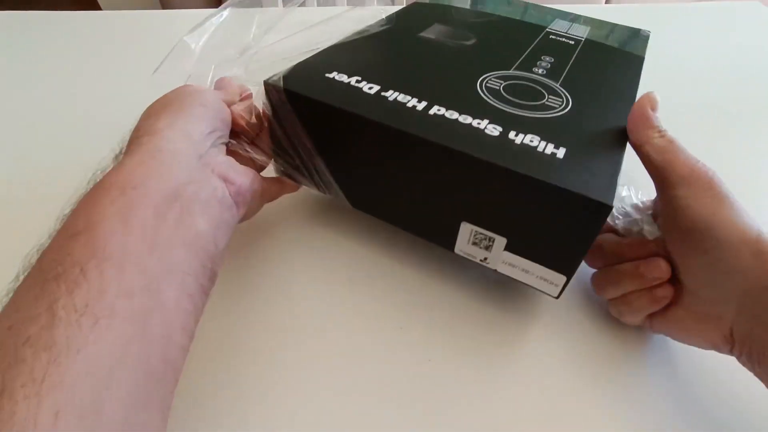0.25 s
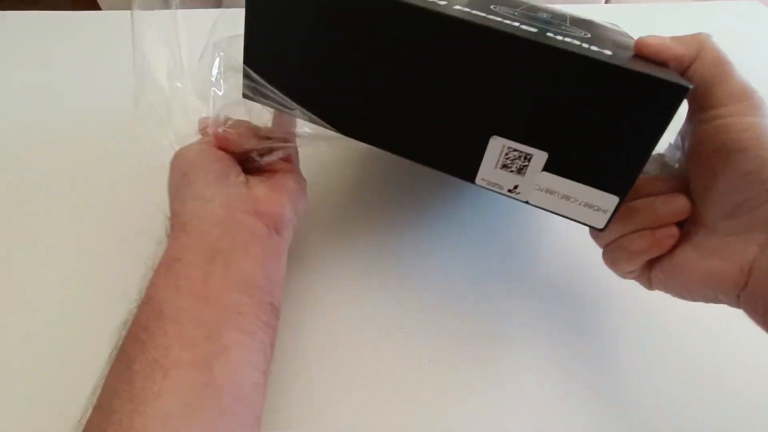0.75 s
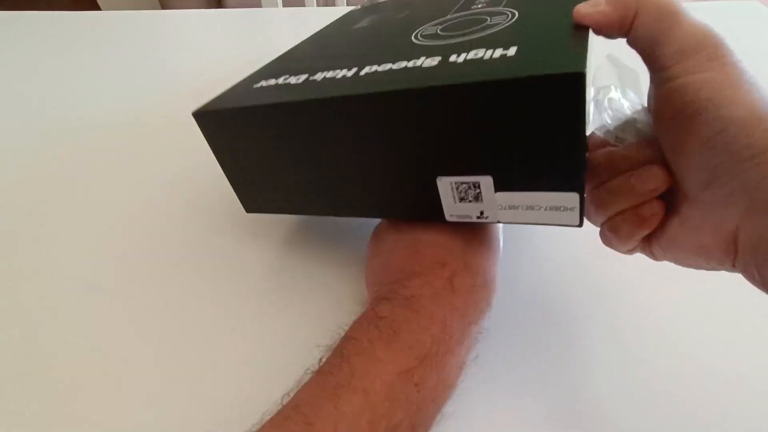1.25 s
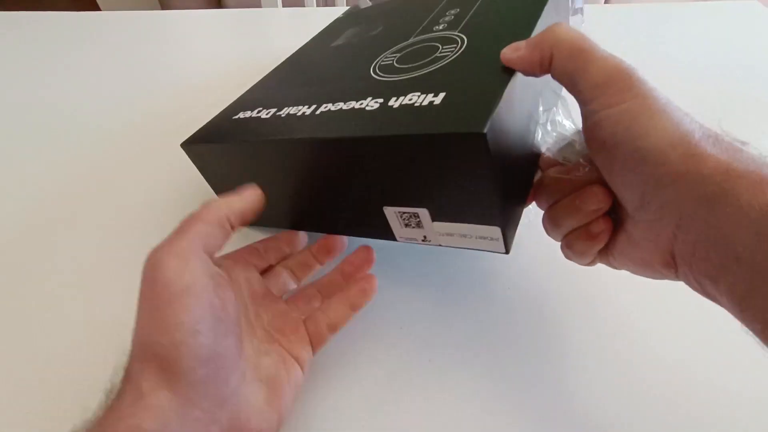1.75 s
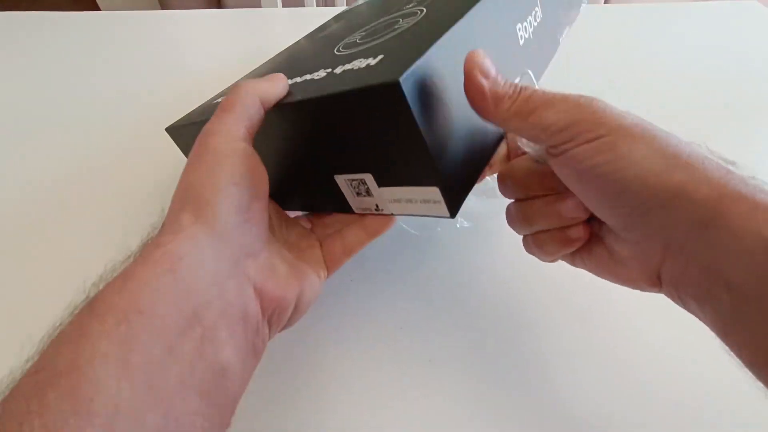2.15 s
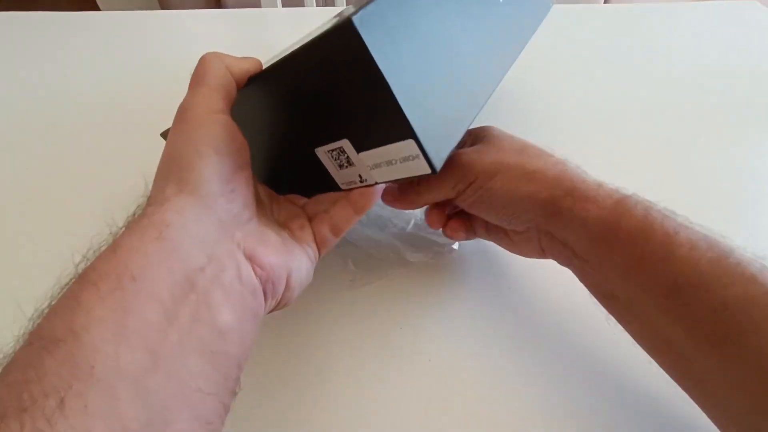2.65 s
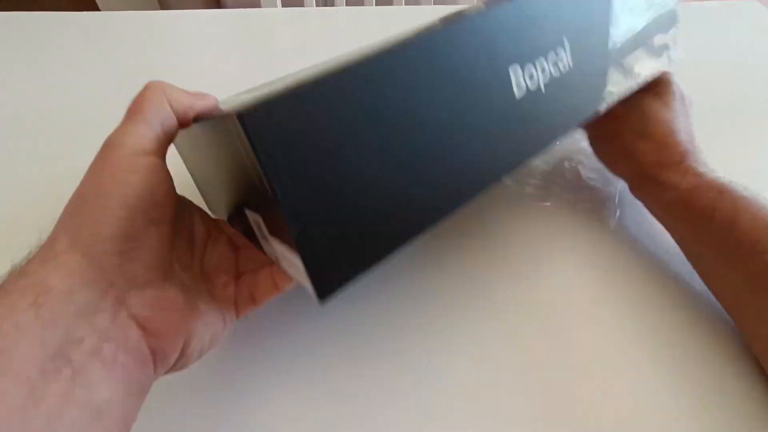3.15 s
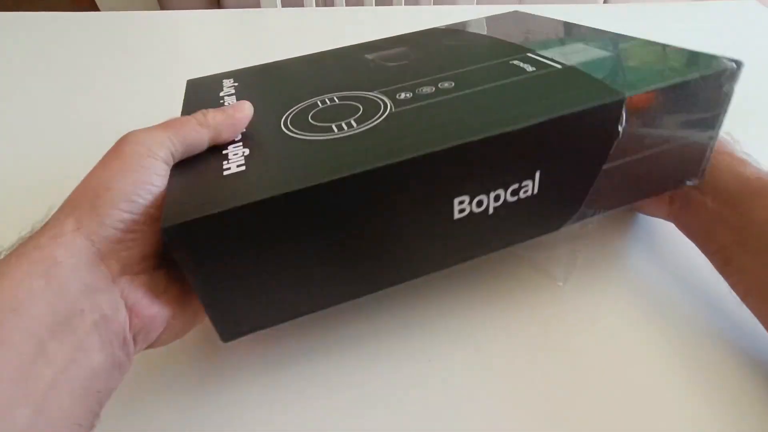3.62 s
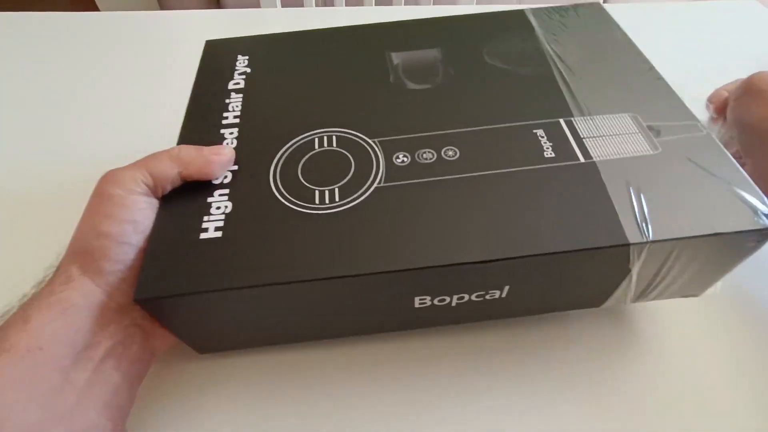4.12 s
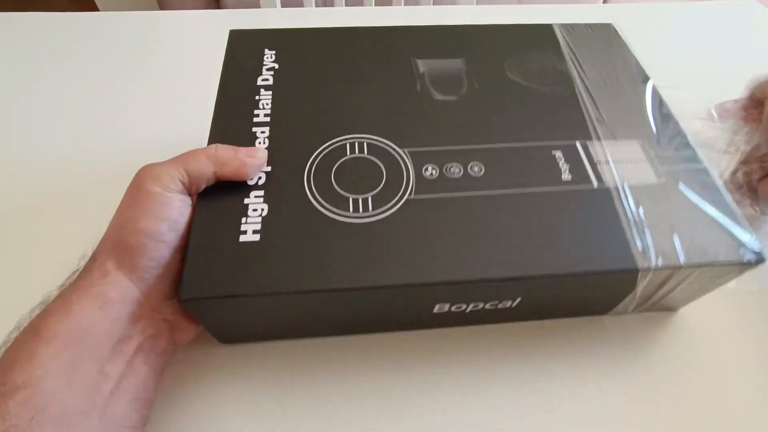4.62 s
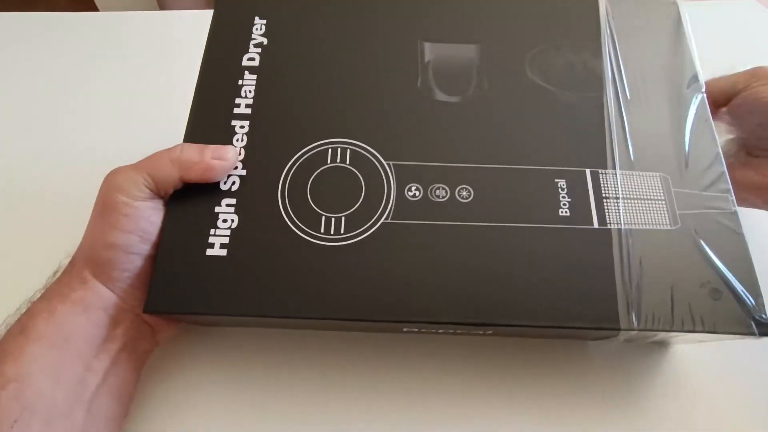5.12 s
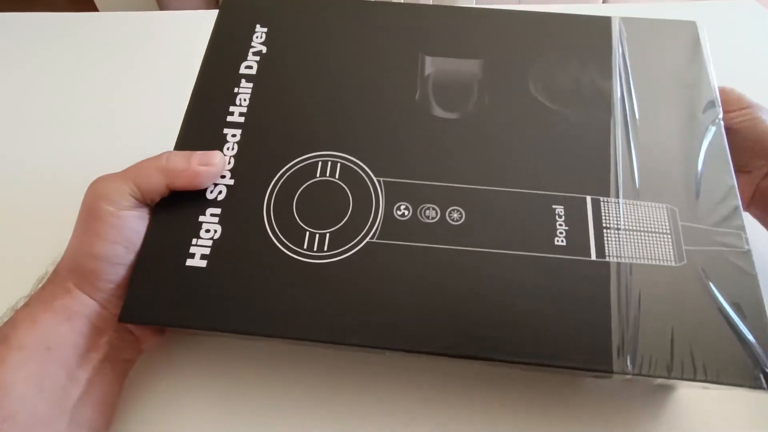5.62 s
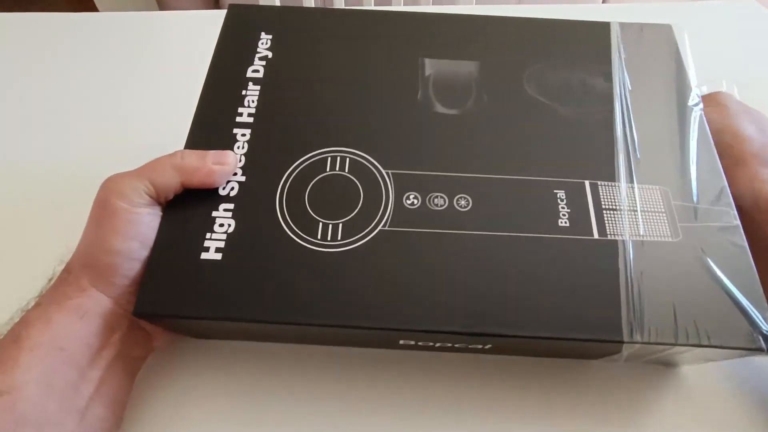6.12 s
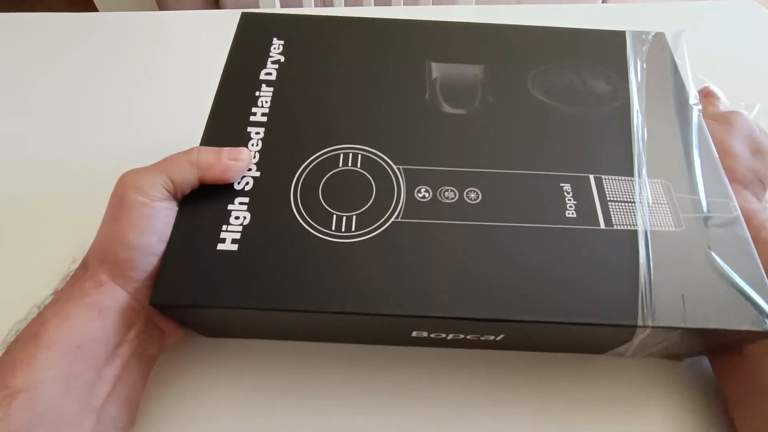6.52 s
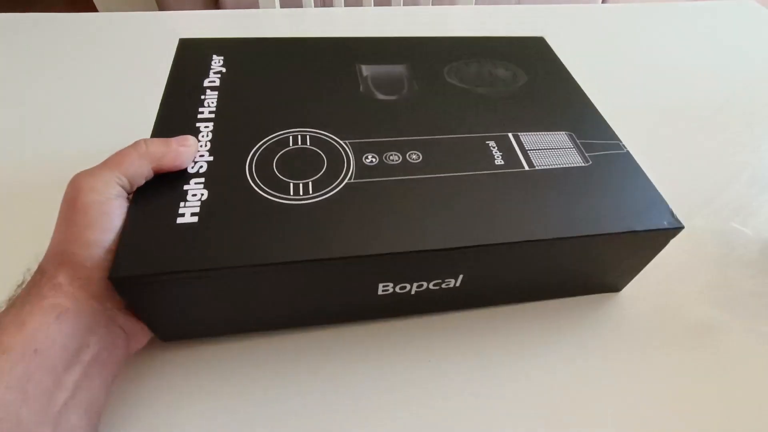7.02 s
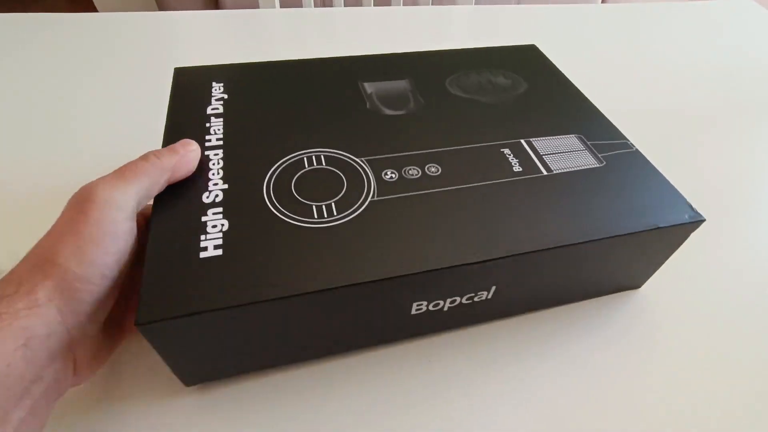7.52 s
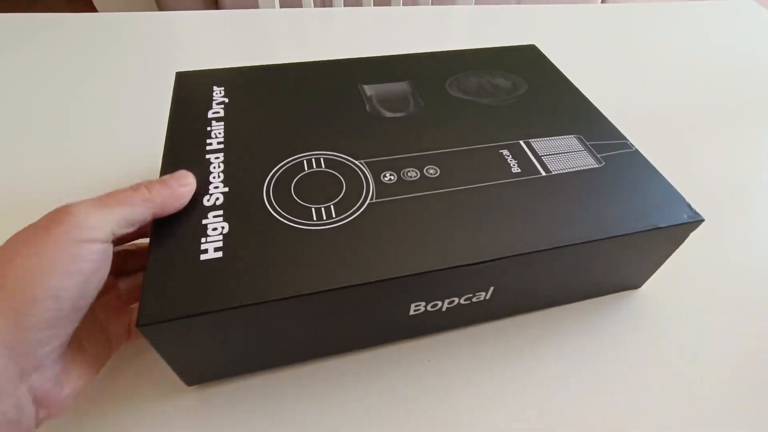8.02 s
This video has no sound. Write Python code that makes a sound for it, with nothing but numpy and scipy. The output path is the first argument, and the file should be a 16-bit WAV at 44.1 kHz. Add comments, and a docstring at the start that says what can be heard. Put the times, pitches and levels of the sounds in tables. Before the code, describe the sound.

Close two-channel pickup in a small quiet room: thin plastic wrap crackles finely from the start, with sharp snaps and a dense burst around one second. Hollow cardboard knocks follow as the box is turned, then rustling swells again near three to four seconds. Later come isolated loud snaps, light knocks and a final tug, fading to sparse crinkles.

```python
"""In a small room, thin plastic film is pulled off a cardboard box and crumpled, close to a two-channel microphone.
The film crackles in thousands of tiny damped swings, with a few loud snaps, drags and scuffs over the card.
The hollow box knocks on hands and table: short pushes, cracks and scrapes set its resonances ringing.
The table top shudders after the heavier knocks; room echoes and quiet filtered noise fill in behind."""
import sys
import numpy as np
from scipy import signal
from scipy.fft import rfft, irfft, next_fast_len
from scipy.io import wavfile
from scipy.ndimage import uniform_filter1d, map_coordinates

SR = 44100
rng = np.random.default_rng(int(sys.argv[2]) if len(sys.argv) > 2 else 0)


def dump_mix(stems):
    """Bounce the given channels to the path in sys.argv[1] as a 16-bit WAV at rate SR."""
    frames = np.atleast_2d(stems).T  # one column per channel
    limited = np.clip(frames, -1, 1)  # hard clip at full scale
    pcm = np.round(limited * 32767).astype(np.int16)
    wavfile.write(sys.argv[1], SR, pcm)


N = 364265

# Resonances of the box walls and of its edges. Each row: pitch in Hz, width in Hz, relative level in dB.
WALLS = [(414, 41.4, -1.5), (500, 26.7, -4.95), (636, 73, -5.4), (808, 73, -2.4), (960, 130, -6)]
EDGE = [(1180, 710, -1), (1625, 360, 4), (2300, 1400, -2), (3270, 2600, -11.5)]
# Hands working the film all along. Each row: time in seconds, relative crackle level in dB,
# treble tilt in dB per octave, relative level in dB of slack folds dragging over the card.
HANDLING = [(0, -32, -4, -41), (.3, -34, -1, -48), (.6, -35, -1.5, -52), (.88, -42, -4, -55),
            (1.5, -31, -4, -48), (1.76, -40, -4, -52), (1.86, -60, -2, -55), (2.03, -60, 0, -55),
            (2.12, -45, 0, -56), (2.42, -53, -1, -60), (2.78, -34, -1.5, -48), (3.5, -32, -2, -43),
            (3.82, -35, -2.5, -46), (4.25, -40, 2, -54), (4.36, -51, -1, -55), (4.62, -50, -2, -59),
            (4.9, -37, -2.5, -52), (5.4, -35, -2, -48), (5.6, -38, -1, -52), (6.36, -38, -2, -47),
            (6.55, -46, 0, -50), (6.92, -37, -1, -50), (7.5, -40, -1, -52), (8.26, -50, 0, -54)]


def amp(db):
    """Turn decibels into a plain factor."""
    return 10 ** (np.asarray(db) / 20)


def unit(x):
    """Scale a sound to an rms (average strength) of 1."""
    return x / np.sqrt(np.mean(x ** 2) + 1e-20)


def along(points, hz):
    """Read a curve of (Hz, value) points on a logarithmic pitch axis."""
    f, v = np.transpose(points)
    return np.interp(np.log(hz + 1), np.log(f + 1), v)


def curves(rows, t):
    """Read each column after the time, at times t, with straight lines between rows."""
    s, *cols = np.transpose(rows)
    return [np.interp(t, s, c) for c in cols]


def wobble(rate):
    """A smooth random curve with `rate` random points a second."""
    knots = rng.standard_normal(int(N * rate / SR) + 4)
    return map_coordinates(knots, [np.arange(N) * rate / SR])


def filtered(x, response):
    """Multiply the spectrum of x by a response, given as a function of frequency."""
    m = next_fast_len(N + SR)
    return irfft(rfft(x, m) * response(np.fft.rfftfreq(m, 1 / SR)), m)[..., :N]


def modes(table):
    """Response of a set of damped resonances, added with alternating sign."""
    def response(f):
        total = 0
        for k, (centre, width, db) in enumerate(table):
            damping = 1j * f * width
            total = total + (-1) ** k * amp(db) * damping / (centre * centre - f * f + damping)
        return total
    return response


def air():
    """The still room: coloured noise, near mono in the bass and less alike between channels in the treble."""
    # Colour of the quiet room. Each row: frequency in Hz, relative level in dB per Hz.
    air_colour = [(15, -37), (25, 6), (145, 4.5), (301, 4), (591, -46), (962, -13), (1100, -17),
                  (2110, -5.5), (7310, -6.5), (9320, -10), (16000, -26)]

    def response(hz):
        return amp(along(air_colour, hz)) * np.array([np.ones_like(hz), hz / (hz + 500)])

    mid, side = filtered(rng.standard_normal((2, N)), response)
    return amp(-46.5) * unit(np.array([mid + side, mid - side]))


def room(x):
    """The walls answer with decaying noise; the source moves, so each moment hears another of several tails."""
    # How fast the echoes fade. Each row: frequency in Hz, time in seconds to fall by 60 dB.
    fade_times = [(100, 0.33), (400, 0.38), (1500, 0.24), (5000, 0.23), (14000, 0.15)]
    hz, t, z = signal.stft(rng.standard_normal((6, 2, SR // 3)), SR, nperseg=256)
    fading = amp(-60 * t / along(fade_times, hz)[:, None])
    tails = signal.istft(z * fading, SR, nperseg=256)[1]
    turn = np.arange(N) / SR / .03  # the next tail takes over every 30 ms
    wet = 0
    for k, tail in enumerate(tails):
        share = np.sqrt((1 - np.abs((turn - k) % len(tails) - 1)).clip(0))
        delayed = np.pad(x * share, (150, 0))[None]  # the echo starts 150 samples late
        wet = wet + signal.oaconvolve(delayed, tail / np.linalg.norm(tail[0]), axes=1)[:, :N]
    return wet


def knocks():
    """Split each knock's strength over the parts: rows of time, big panels, small panels, walls, edge, table."""
    # Knocks of the box. Each row: time in seconds, relative push in dB, share on the small panels (0-1),
    # relative crack in dB, share on the edge (0-1).
    knock_rows = [(.165, -32, .7, -37, .25), (.394, -36, .8, -41, .7), (.578, -27, .2, -32, .7),
                  (.635, -17.5, .2, -17, .75), (.927, -29, .3, -23, .5), (.939, -14.5, .1, -5, .75),
                  (.963, -22, .95, -30, .7), (1.237, -26.5, .15, -45, .8), (1.274, -18, .2, -45, .3),
                  (1.644, -21.5, .2, -37, .4), (1.792, -6.5, .2, -18, .2), (1.912, -27.5, .95, -43, .6),
                  (3.014, -32, .6, -34, .8), (3.12, -12, .3, -40, .7), (3.286, -14.5, .99, -29, .15),
                  (3.31, -11, .07, -36, .3), (3.444, -21, .03, -36, .7), (3.566, -24.5, .75, -29, .5),
                  (4.414, -31, .45, -20.5, .93), (4.726, -22, .7, -26, .5), (4.739, -11, .83, -12, .1),
                  (4.791, -19, .1, -27, .5), (5.092, -31, .65, -35, .5), (5.205, -27.5, .15, -34, .6),
                  (5.684, -29, .02, -45, .8), (6.425, -28, .45, -23, .85), (6.557, -36, .8, -48, .3),
                  (6.618, -34, .8, -44, .3), (6.701, -27, .45, -24, .7), (6.724, -25, .6, -33, .5),
                  (6.76, -27, .2, -32, .8), (7.084, -29, .6, -35, .9), (7.11, -24, .75, -33, .5),
                  (7.193, -27, .5, -14, .7), (7.201, -33, .5, -16, .6), (7.213, -17, .93, -19, .3)]
    # The box weighs down on the table top. Each row: time in seconds, relative level in dB.
    bump_rows = [(.394, -42), (.963, -31), (1.912, -27.5), (3.286, -27), (3.444, -26), (4.235, -25.5),
                 (5.205, -36), (6.705, -27), (6.76, -29)]
    s, push, small, crack, edge = np.transpose(knock_rows)

    def part(db, share):
        return db + 10 * np.log10(share.clip(.01, 1))

    rows = [s, part(push, 1 - small), part(push, small),
            part(crack, 1 - edge), part(crack, edge),
            push - 21]  # what the table top gets of each push, before the box's own part levels
    bumps = [(at, -120, -120, -120, -120, db) for at, db in bump_rows]  # -120 dB: next to nothing
    return list(np.transpose(rows)) + bumps


def box():
    """Each knock is a soft push into panels and table, a crack and scrape into walls and edges; hands rub."""
    # Resonances of big panels, small panels and table top.
    # Each row: pitch in Hz, width in Hz, relative level in dB.
    big_panels = [(102, 40, -6), (116, 18.3, 2), (153.2, 47.5, 1.5)]
    small_panels = [(252, 20.8, 4.5), (298.4, 21.3, 1.5), (343, 60, -3.5)]
    table_top = [(34.7, 2.7, 0), (58.6, 7.5, 0)]
    # Hands shifting on the box. Each row: time in seconds, relative rub level in dB, table shudder in dB.
    grip_rows = [(0.0, -46.5, -61), (1.01, -43, -52), (2.85, -53, -55), (3.38, -42, -35), (3.84, -45, -55),
                 (4.23, -52.5, -50), (5.29, -43, -55), (6.83, -49, -57), (8.26, -55.5, -61)]
    parts = np.zeros((2, 5, N + SR))
    t = np.arange(-512, 2048) / SR
    soft = np.exp(-(t - .002) ** 2 / 0.00071 ** 2)
    crack = 8 * np.exp(-(t - .004) ** 2 / .00006 ** 2)

    def scrape(fall):
        """Noise of random signs that rises in about 4 ms and dies away over `fall` seconds."""
        envelope = np.exp(-np.maximum((.003 - t) / .004, (t - .003) / fall))
        return np.sign(rng.standard_normal(len(t))) * envelope

    part_db = [15.1, 18.1, 13, 6.8, 26.3]
    facing_db = np.outer([.5, -.5], [1, -0.6, -1.4, -2.3, 2.8])  # each part faces its own way
    for s, *db in knocks():
        small_push = soft * np.sign(rng.standard_normal())  # inward or outward
        push = [soft, small_push, crack + scrape(0.018), crack + scrape(0.012), soft]
        level_db = np.add(db, part_db) + facing_db
        slot = parts[..., round(s * SR) - 512:][..., :len(t)]
        slot += amp(level_db)[..., None] * push
    bodies = (big_panels, small_panels, WALLS, EDGE, table_top)
    *card, table = [filtered(parts[:, k, :N], modes(body)) for k, body in enumerate(bodies)]

    rub_db, shudder_db = curves(grip_rows, np.arange(N) / SR)
    noise = rng.standard_normal((3, N))
    rub = amp(4.5 * wobble(12)) * filtered(noise[0], modes(big_panels + small_panels))
    rub = amp(rub_db) * unit(rub)
    shudder = noise[1] + 0.65 * noise[2] * [[1], [-1]]  # the channels shake a little apart
    shudder = amp(1.2 * wobble(5)) * filtered(shudder, modes(table_top))
    shudder = amp(shudder_db) * unit(shudder)
    return sum(card) + rub, table + shudder


def creases(s, db, hz, cycles, spread_ms, size):
    """Each buckling crease is a short damped swing, in or out, reaching both channels from its own spot."""
    # Where the film is. Each row: time in seconds, left above right in dB, left behind right in ms.
    place_rows = [(0, -3, -0.13), (1, 0, .15), (2.5, -1.8, -0.18), (3.5, -0.2, -0.14), (4.5, 2, -.28),
                  (6.5, 2, -0.24), (8.26, 0, -0.42)]
    turns = hz[:, None] * np.arange(size) / SR
    spot = rng.standard_normal((len(s), 3))
    envelope = turns / cycles * np.exp(1 - turns / cycles)
    swing = np.sign(spot[:, 2:]) * np.sin(2 * np.pi * turns) * envelope
    pan_db, lag_ms = curves(place_rows, s)
    pan_db = pan_db + 1.5 * spot[:, 0]
    lag = (lag_ms + spread_ms * spot[:, 1]) / 1000
    channels = []
    for side in (.5, -.5):  # left, then right
        start = np.round((s + side * lag) * SR).astype(int).clip(0)
        at = start[:, None] + np.arange(size)
        pieces = amp(db + side * pan_db)[:, None] * swing
        channels.append(np.bincount(at.ravel(), pieces.ravel(), N + SR)[:N])
    return np.array(channels)


def crackle(count, low_hz, high_hz, colour, scatter_db, patchy_db, cycles, size):
    """A dense clumpy shower of creases, many small and few large, evened out to a running rms of about 1."""
    u = rng.random((count, 3))
    s = u[:, 0] * N / SR
    hz = low_hz * (high_hz / low_hz) ** np.sqrt(u[:, 1])  # small creases outnumber large ones
    clump_db = 2.2 * wobble(28) + 0.7 * wobble(120)
    # patches of film of one size go off together
    patch_grid = rng.standard_normal((400, 40))
    patch = map_coordinates(patch_grid, [30 * s, 3.51 * np.log2(hz / low_hz)], mode="wrap")
    cycles = cycles * (hz / low_hz) ** .4  # small creases swing more often
    db = colour(s, hz) + 20 * np.log10(hz) - 10 * np.log10(cycles) - 5 * np.log10(u[:, 1] + .01)
    db = db - scatter_db * np.log(u[:, 2] + 0.0049)  # a few creases stand out
    db = db + patchy_db * patch + clump_db[(s * SR).astype(int)]
    shower = creases(s, db, hz, cycles[:, None], spread_ms=.12, size=size)
    power = uniform_filter1d((shower ** 2).mean(0), size=3000)
    return shower / np.sqrt(np.abs(power) + 1e-20)


def crumple(t):
    """Level of the crackle in dB: the power of the steady handling plus that of every tug."""
    # Tugs at the film, each a swell, a hold and a release.
    # Each row: peak time in seconds, relative level in dB, swell in seconds per 20 dB, hold in seconds.
    tug_rows = [(.57, -30, .05, .02), (.73, -21, .03, .003), (.78, -28, .03, .003), (.945, -28, .03, .05),
                (1.07, -17, .15, .05), (1.18, -25, .1, .02), (1.33, -28, .1, .04), (1.78, -36, .1, .005),
                (2.28, -40, .1, .01), (2.59, -31, .12, .01), (2.71, -34, .05, .01), (3.0, -22, .35, .04),
                (3.12, -30, .1, .03), (3.34, -27, .35, .05), (3.91, -21.5, .12, .05),
                (4.416, -19, .03, .025), (4.73, -25, .09, .01), (4.99, -31, .06, .01),
                (5.09, -27, .12, .04), (5.2, -26, .03, .09), (5.49, -31, .15, .02), (5.76, -33, .04, .02),
                (5.995, -32, .02, .02), (6.24, -33, .15, .02), (6.43, -27, .06, .01), (6.63, -35, .05, .05),
                (6.7, -18.5, .035, .015), (6.79, -27.5, .1, .03), (7.07, -27, .12, .05),
                (7.16, -31, .05, .03), (7.6, -33, .05, .02)]
    release_db_per_s = 135
    power = amp(curves(HANDLING, t)[0]) ** 2
    for s, db, swell, hold in tug_rows:
        before_db = 20 * (s - t).clip(0) / swell
        after_db = release_db_per_s * (t - s - hold).clip(0)
        power = power + amp(db - before_db - after_db) ** 2
    return 10 * np.log10(power)


def fizz():
    """The fine crackle of the film: tight film crackles higher than slack, so the treble tilts over time."""
    # Colour of the crackle. Each row: frequency in Hz, relative level in dB per Hz.
    film_colour = [(710, -39), (1200, -37.5), (1830, -5.5), (2000, -6.5), (2980, -5), (3400, -5.5),
                   (4360, -5), (5300, -5.5), (9010, -2), (11000, -6), (16000, -7)]

    def colour(s, hz):
        return along(film_colour, hz) + curves(HANDLING, s)[1] * np.log2(hz / 5500)

    return crackle(count=50000, low_hz=1530, high_hz=16160, colour=colour,
                   scatter_db=.9, patchy_db=1.8, cycles=1.2, size=64)


def drag():
    """Slack folds dragging over the card: a sparser, lower crackle that gets weaker with pitch."""
    return crackle(count=8000, low_hz=509, high_hz=1940, colour=lambda s, hz: -5 * np.log2(hz),
                   scatter_db=3.5, patchy_db=2.0, cycles=1.9, size=192)


def scuffs():
    """A fold of film scuffs along the card: 200 creases near one pitch, spread over a short stretch."""
    # Each row: start in seconds, length in seconds, relative level in dB of each crease, pitch in Hz.
    scuff_rows = [(2.965, .09, -46, 1000), (6.232, 0.048, -45, 760), (6.235, .045, -42, 1500),
                  (7.59, 0.05, -46, 2350), (7.741, .23, -47.5, 2270)]
    u = rng.random((len(scuff_rows), 200, 2))
    s, length, db, hz = np.transpose(scuff_rows)[:, :, None]
    times = s + length * u[..., 0]
    pitch = hz * 2 ** (0.6 * u[..., 1] - .3)
    return creases(times.ravel(), np.repeat(db, 200), pitch.ravel(), 1.4, spread_ms=0.068, size=512)


def snaps(s, db, hz):
    """A snap is a run of buckles of all sizes around its pitch, over about 4 ms, strongest near the middle."""
    count = 24  # buckles in each snap
    s, db, hz = (np.repeat(v, count) for v in (s, db, hz))
    chance = rng.random((len(s) // count, 2, count))
    step = np.tile(np.arange(count), len(chance))
    octaves = 3.44 * ((step + chance[:, 0].ravel()) / count - .6)
    late = chance[:, 1].ravel() - .55
    pitch = hz * 2 ** octaves
    db = db - 6 - 3.23 * octaves ** 2 + 4.3 * octaves  # strongest a little above the named pitch
    db = db - 22 * np.abs(late) - 20 * np.log2(pitch / 10500).clip(0)
    return creases(s + .0008 + .004 * late, db, pitch.clip(500, 16000), 1.13, spread_ms=0.047, size=96)


def near_snaps():
    """The single snaps: listed loud creases, and 400 random small ones that follow the crumpling's strength."""
    # Loud creases. Each row: time in seconds, relative level in dB, pitch in Hz.
    snap_rows = [(0.1186, -17, 4140), (0.2008, -14, 2840), (0.2412, -9, 4820), (0.3446, -20, 4970),
                 (0.3802, -11, 7400), (0.39, -13, 7700), (0.4034, -10, 8200), (0.4934, -18, 6000),
                 (0.516, -7, 8360), (0.5524, -13, 4680), (0.5657, -9, 4700), (0.7305, -2, 2830),
                 (0.7804, -7, 7450), (0.837, -6, 6650), (0.9435, -1, 2860), (0.9994, -6, 6300),
                 (1.0334, -10, 2630), (1.059, -9, 9500), (1.067, -3, 5230), (1.0855, -5, 5800),
                 (1.098, -6, 9000), (1.1384, -8, 2300), (1.3207, -15, 3800), (1.3503, -16, 2800),
                 (1.7712, -22, 3620), (2.0547, -12, 5970), (2.1514, -18, 8300), (2.2747, -15, 7300),
                 (2.4477, -11, 8500), (2.5023, -17, 4730), (2.5237, -15, 9250), (2.5416, -6, 7400),
                 (2.5615, -13, 6500), (2.567, -9, 9700), (2.5864, -13, 5900), (2.5925, -10, 7500),
                 (2.598, -3, 6800), (2.626, -17, 3000), (2.64, -17, 4500), (2.7016, -13, 8750),
                 (2.711, -13, 6000), (2.722, -14, 3000), (2.7998, -13.5, 3720), (2.8374, -15, 3600),
                 (2.9714, -7, 8760), (3.018, -7, 5000), (3.5522, -13, 5610), (3.8521, -8, 7000),
                 (3.908, -13, 6100), (4.0555, -16, 9000), (4.127, -17, 8000), (4.144, -18, 6500),
                 (4.17, -21, 7000), (4.4158, -1, 5500), (4.4225, -6, 4200), (4.4315, -2, 5340),
                 (4.439, -6, 6690), (4.6828, -11, 6900), (4.727, -6.5, 8360), (4.769, -9, 6000),
                 (4.993, -17, 2900), (5.0906, -3.5, 7400), (5.114, -10, 3700), (5.2013, -14, 7100),
                 (5.6153, -2, 9600), (5.642, -17, 8000), (5.7283, -7, 9600), (5.7548, -19, 4950),
                 (5.771, -16, 5000), (5.8256, -12, 7380), (5.859, -14, 8500), (5.9893, -13, 9400),
                 (6.3975, -9, 9100), (6.4104, -15, 10200), (6.419, -16, 4000), (6.426, -9, 3000),
                 (6.4284, 1, 6500), (6.5777, -19.5, 7260), (6.7005, -8, 6230), (7.0799, -1, 6540),
                 (7.1094, -14, 7390), (7.5245, -15, 2410), (8.081, -21, 8300)]
    u = rng.random((400, 3))
    s = u[:, 0] * N / SR
    around_db = .5 * (crumple(s) + curves(HANDLING, s)[0])
    small = snaps(s, around_db + 8 + 8 * u[:, 1], 3800 * 2.6 ** u[:, 2])
    return small + snaps(*np.transpose(snap_rows))


def film():
    """The film buckles as it is pulled: gives the spread-out crackle and the near, single snaps."""
    t = np.arange(N) / SR
    level_db = np.interp(t, t[::32], crumple(t[::32]))
    steady_db, _, drag_db = curves(HANDLING, t)
    drag_db = drag_db + .45 * (level_db - steady_db)  # tugs strengthen the drag too, by fewer dB
    spread = amp(level_db) * fizz() + amp(drag_db) * drag() + scuffs()
    return spread, near_snaps()


def scene():
    """Film, box and table sound directly, with the room's answer and the still air around them."""
    (spread, near), (card, table) = film(), box()
    card += amp(-8) * filtered(near, modes(WALLS + EDGE))  # snaps pass into the walls of the box
    dry_mix = amp(-1.0) * spread + amp(-3.5) * near + amp(-6) * card
    left, right = room(dry_mix.mean(0))
    # long waves reach both channels alike
    side = filtered((left - right) / 2, lambda hz: hz ** 2 / (hz ** 2 + 130 ** 2))
    echo = (left + right) / 2 + side * [[1], [-1]]
    card[0] = np.pad(card[0], (8, 0))[:N]  # the box sits a little off the middle
    return spread + near + card + table + echo + air()


def record(dry):
    """The loudest peaks are rounded off, the top treble is lowered and the deepest bass is weakened."""
    top_hz, shelf_hz, shelf_db = 15950, 11600, -5  # treble is lower above shelf_hz and absent from top_hz
    rounded = dry / (1 + np.abs(dry / .85) ** 4) ** .25

    def response(hz):
        shelf = amp(shelf_db / (1 + (shelf_hz / (hz + 1)) ** 20))
        bass_cut = hz ** 2 / (hz ** 2 + 15 ** 2)
        return (hz < top_hz) * shelf * bass_cut

    return filtered(rounded, response)


dry = scene()
out = record(dry)
dump_mix(out)
```